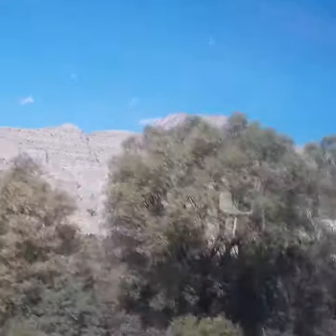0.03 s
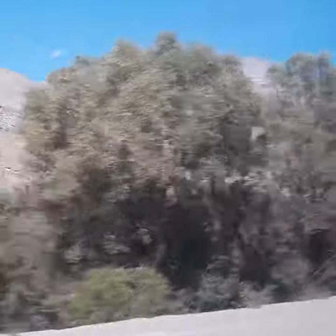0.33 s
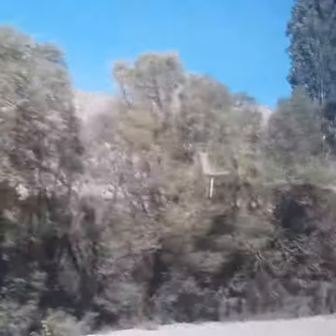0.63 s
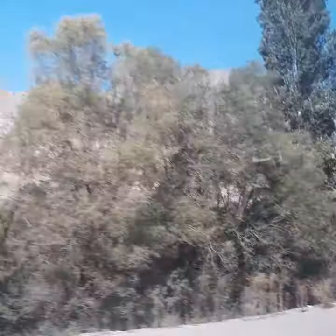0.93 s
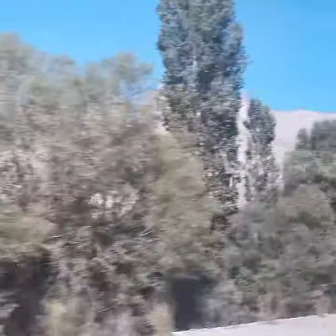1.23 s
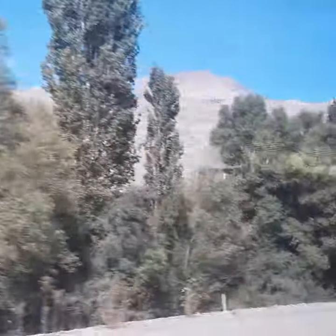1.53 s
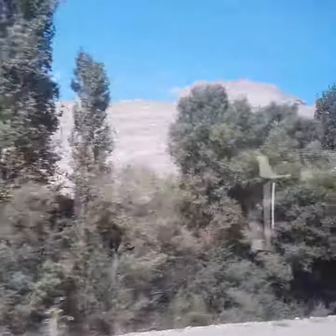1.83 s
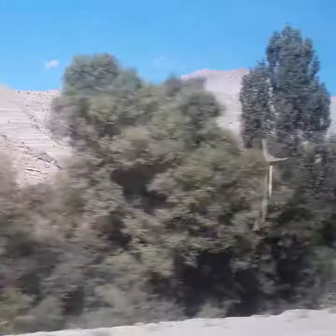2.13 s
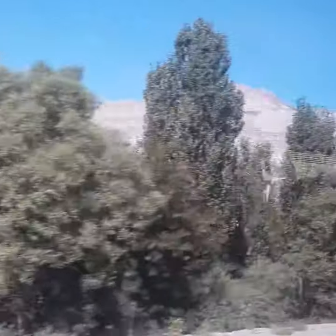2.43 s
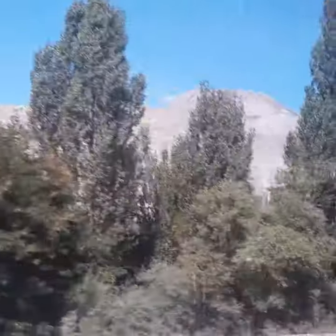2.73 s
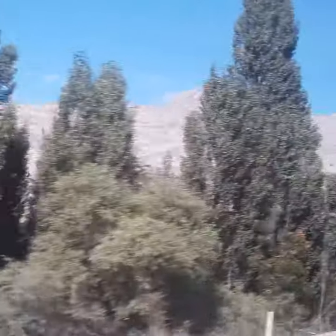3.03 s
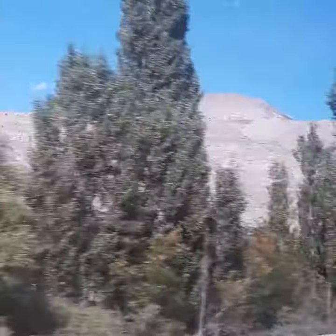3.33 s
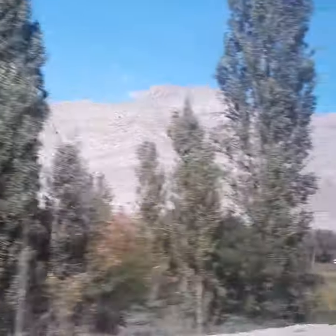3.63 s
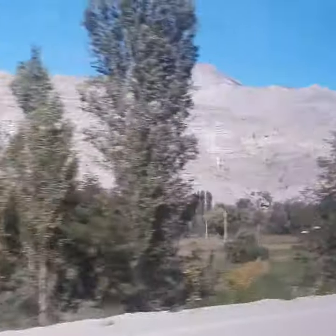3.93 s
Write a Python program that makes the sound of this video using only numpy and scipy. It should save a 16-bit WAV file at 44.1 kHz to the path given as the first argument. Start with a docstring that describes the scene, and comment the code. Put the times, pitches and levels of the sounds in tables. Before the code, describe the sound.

Low road rumble inside a moving bus, with loose trim knocking and rattling.

```python
"""Inside a bus rolling steadily along a country road, stereo microphones at a window seat.
The road shakes the body and the cabin air into a low boom and rumble, with a few thuds from bumps.
Behind that sit tyre roar through the walls, a faint engine drone and the hiss of passing air.
Loose trim knocks and chatters, parts scuff together and thin squeals come and go. Small ticks sound
close to the left microphone, and late on a thin panel buzzes to the right."""
import sys
import numpy as np
from scipy import signal
from scipy.fft import rfft, irfft
from scipy.io import wavfile
from scipy.ndimage import uniform_filter1d

SR = 44100
rng = np.random.default_rng(int(sys.argv[2]) if len(sys.argv) > 2 else 0)


def persist_wave(psi):
    """Save psi, clipped to +-1, as 16-bit WAV."""
    counts = np.round(np.clip(psi, -1, 1) * 32767).astype(np.int16)
    wavfile.write(sys.argv[1], SR, np.atleast_2d(counts).T)


N = 176400
TIME, FREQ = np.arange(N) / SR, np.fft.rfftfreq(N, 1 / SR)
KNOCK_S = .003  # time scale of one contact of the trim

# lean of the cabin sound to the left microphone: f/Hz, left minus right/dB
CABIN_BALANCE = [(140, 2.5), (215, 0.7), (255, 1.5), (320, 1), (530, 3.5), (800, -0.6)]
# lean of the trim and panel to the left microphone: f/Hz, left minus right/dB
TRIM_BALANCE = [(1000, 9.5), (2300, -5), (3700, -8), (6000, 3), (15000, 3)]
# rise and fall of tyre roar and engine drone: t/s, gain/dB
DRIVE_LEVEL = [(0, 3), (.6, -0.5), (1.7, -0.5), (2.4, 1.1), (3.3, 1), (4, 1.5)]
# how hard the loose fittings shake: t/s, gain/dB
SHAKE_LEVEL = [(.17, 3.5), (.55, 0), (.87, 2), (1.2, 1.5), (1.45, 0), (2.3, 1.5), (2.65, 2.5), (3.14, 3.5),
               (3.3, 0.5), (3.48, 3.5), (3.75, 1)]


def amp(db):
    """Decibels to gain."""
    return 10 ** (np.asarray(db) / 20)


def unit(x):
    """Scales to rms 1."""
    return x / np.sqrt(np.mean(x ** 2) + 1e-20)


def read(points, hz, column=1):
    """Reads a spectrum table on a log-frequency axis."""
    table = np.transpose(points)
    return np.interp(np.log(hz + 1), np.log(table[0] + 1), table[column])


def level(points):
    """Gain over time from a dB curve."""
    return amp(np.interp(TIME, *np.transpose(points)))


def add(mix, start, sound):
    """Mixes a sound in at a time in seconds."""
    part = mix[..., max(round(start * SR), 0):][..., :sound.shape[-1]]
    part += sound[..., :part.shape[-1]]


def drift(rate_hz):
    """Random wander of rms 1, rolling off above the given rate."""
    lowpass = np.exp(-(FREQ / rate_hz) ** 2) * (FREQ > 0)
    return unit(irfft(rfft(rng.standard_normal(N)) * lowpass, N))


def swell(start, length):
    """An arch of gain that rises at the start and is gone after the length."""
    return np.sqrt(abs(np.sin(np.pi * np.clip((TIME - start) / length, 0, 1))))


def sides(db):
    """Left and right microphone gains for a left-minus-right level."""
    return amp(np.array([db, -db]) / 2)


def cabin_noise(gain):
    """Stereo noise of rms 1 with a given spectral shape, alike at both microphones in the bass."""
    # likeness of the two microphone signals: f/Hz, correlation
    likeness = [(30, 0.77), (90, 1), (160, 0.87), (270, 0.79), (450, 0.64), (740, 0.23), (1220, 0)]
    same = np.clip(read(likeness, FREQ), -1, 1)
    left, independent = rfft(rng.standard_normal((2, N)))
    right = same * left + np.sqrt(1 - same ** 2) * independent
    return unit(irfft(np.array([left, right]) * gain * sides(read(CABIN_BALANCE, FREQ)), N))


def steadied(x, size):
    """Evens out swells longer than about size samples and keeps the quick throb."""
    power = uniform_filter1d(uniform_filter1d((x ** 2).mean(0), size), size)
    return x / np.sqrt(abs(power) + 1e-9)


def colour(x, spectrum, balance, size=2048):
    """Minimum-phase stereo filter of unit energy, so nothing sounds ahead of an attack."""
    hz = np.fft.rfftfreq(size, 1 / SR)
    log_gain = np.log(amp(read(spectrum, hz)) * sides(read(balance, hz)))
    cepstrum = irfft(log_gain)
    cepstrum[:, 1:size // 2] *= 2
    cepstrum[:, size // 2 + 1:] = 0
    taps = unit(irfft(np.exp(rfft(cepstrum)))) / np.sqrt(size)
    return signal.oaconvolve(x, taps, axes=1)[:, :N]


def impact(contact_s, tail_db, tail_s, size=5000):
    """A short burst of contact noise that builds and dies, and its reflections in the cabin."""
    t = np.arange(size) / SR
    age = 2 * t / contact_s
    contact = age * np.exp(1 - age)
    reflections = amp(tail_db) * np.exp(-t / tail_s) * (1 - np.exp(-age))
    return rng.standard_normal((2, size)) * (contact + reflections)


def boom():
    """The uneven road excites the lowest resonances of the air around the microphones."""
    # resonances of the cabin air: f/Hz, width/Hz, relative level/dB
    air_modes = [(44.3, 6.4, -15.5), (80.2, 12.4, -0.5), (100.4, 8.4, -2.5)]
    # surges of the boom: t/s, level/dB
    surges = [(0, -18.5), (.42, -21), (.57, -14.5), (.68, -23), (.88, -25), (1.0, -17.5), (1.24, -19.5),
              (1.36, -24), (1.58, -23.5), (1.74, -17.5), (2.07, -24.5), (2.25, -19.5), (2.44, -16.5),
              (2.7, -25), (3.05, -17.5), (3.16, -24.5), (3.58, -15), (3.75, -25.5)]
    resonance = sum(amp(db) / (1 + ((FREQ - hz) / width) ** 2) ** 1.78 for hz, width, db in air_modes)
    low_cut = 1 - np.exp(-(FREQ / 35.8) ** 4)
    return steadied(cabin_noise(resonance * low_cut), size=5000) * level(surges)


def road():
    """Rumble comes up through the floor and tyre roar in through the walls."""
    # spectrum of the shaking floor and body: f/Hz, relative level/dB
    rumble_spectrum = [(27, -36), (42, -26), (60, -3), (85, -12.5), (110, 1), (135, 2.5), (165, -1),
                       (186, -2.5), (203, -0.5), (225, -5), (247, -1), (268, -5), (295, -5.5), (335, -12.5),
                       (420, -21), (700, -30), (2000, -65.5)]
    # rise and fall of the rumble as the surface changes: t/s, gain/dB
    surface = [(0, 1.5), (.7, -0.5), (1.45, -1.5), (2.47, 1.3), (3.2, 1), (4, -.5)]
    # spectrum of the tyres from inside: f/Hz, relative level/dB
    roar_spectrum = [(100, -3), (280, -33), (370, 1), (450, -2.5), (535, 1.5), (590, -1), (640, -2),
                     (745, -7), (850, -7), (1100, -13), (1500, -23), (2200, -35.5), (12000, -76)]
    rumble = amp(-19) * steadied(cabin_noise(amp(read(rumble_spectrum, FREQ))), size=6000)
    roar = amp(-32) * steadied(cabin_noise(amp(read(roar_spectrum, FREQ))), size=6000)
    return rumble * level(surface) + roar * level(DRIVE_LEVEL)


def engine(speed_wander=.0124, waver=.3):
    """A few faint engine orders wander together in pitch, each wavering in strength."""
    # engine orders: f/Hz, level/dB
    orders = [(92, -28.5), (393, -42), (535, -48.5), (635, -47)]
    speed = 1 + speed_wander * drift(2.78)
    drone = np.zeros((2, N))
    for hz, db in orders:
        strength = amp(db) * np.sqrt(2) * (1 + waver * drift(5.8))
        cycles = np.cumsum(hz * speed) / SR + rng.random()
        drone += sides(read(CABIN_BALANCE, hz))[:, None] * strength * np.sin(2 * np.pi * cycles)
    return drone * level(DRIVE_LEVEL)


def air(hiss_db=-43, flicker_db=1.27, patch_db=1):
    """Passing air hisses, flickering slightly and rising with the shake of the fittings."""
    # spectrum of the hiss at each microphone: f/Hz, relative level left/dB, right/dB
    hiss_spectrum = [(494, -43, -20), (1235, 7.5, 4.5), (2140, 0, 4), (3430, -3, -2), (4010, -4.5, -.5),
                     (4850, -8, -8.5), (7600, -15.5, -16.5), (9100, -14, -15), (9900, -20, -20),
                     (12800, -15.5, -23), (15600, -17.5, -51)]
    gain = amp([read(hiss_spectrum, FREQ, column=1), read(hiss_spectrum, FREQ, column=2)])
    noise = irfft(rfft(rng.standard_normal((2, N))) * gain, N)
    frames = signal.stft(noise, nperseg=512)[2]
    patches = rng.standard_normal(frames.shape[1:])  # louder and softer spots in frequency and time
    patches = unit(uniform_filter1d(uniform_filter1d(patches, size=9, axis=0), size=9, axis=1))
    hiss = signal.istft(frames * amp(patch_db * patches), nperseg=512)[1][:, :N]
    return amp(hiss_db + flicker_db * drift(26)) * level(SHAKE_LEVEL) ** .79 * unit(hiss)


def chatter(taps_per_s=100, spread_db=8.5, chatter_db=-54):
    """Shaking trim makes faint random taps, each a dying burst of noise."""
    onsets = rng.random(N) < taps_per_s / SR
    taps = onsets * amp(spread_db * np.minimum(rng.exponential(1, N), 3))
    contact = signal.lfilter([1], [1, -np.exp(-1 / (KNOCK_S * SR))], taps)
    return amp(chatter_db) * level(SHAKE_LEVEL) * unit(contact * rng.standard_normal((2, N)))


def trim_ring(spread_db=1.2, detune=.04, size=6000):
    """Struck trim rings hollow, in a slightly different blend and tuning at every blow."""
    # modes of the trim: f/Hz, relative level/dB, t60/s
    modes = [(935, -5, 0.068), (1172, -11, .05), (1750, -10, 0.019), (2180, -1, .022), (2620, -9, .028),
             (3720, -9.5, 0.042)]
    t = np.arange(size) / SR
    ring = np.zeros((2, size))
    for hz, db, t60 in modes:
        fade = amp(db + spread_db * rng.standard_normal()) * np.exp(-np.log(1000) * t / t60)
        pitch = hz * (1 + detune * rng.standard_normal())
        tone = np.sin(2 * np.pi * (pitch * t + rng.random((2, 1))))
        ring += sides(read(TRIM_BALANCE, hz))[:, None] * fade * tone
    return ring * (1 - np.exp(-2 * t / KNOCK_S))


def trim(treble_hz=4150):
    """Loose trim, jolted by the road, knocks with a clack and a ring over its own faint chatter."""
    # knocks of the trim: t/s, level/dB, extra treble/dB
    knocks = [(0.2484, -33.5, 3.5), (.32, -37, 0), (0.3395, -32, 7), (.348, -35, -1), (.92, -33.5, -7),
              (1.078, -39, 6), (1.1453, -33, 0), (1.162, -33, -6), (1.2253, -29.5, 3.5), (1.284, -37.5, 0),
              (2.15, -27, -4), (2.4254, -35, 1), (2.645, -34, 2.5), (2.911, -30, 6), (2.924, -34, 1),
              (3.105, -33.5, -4), (3.241, -35, 0), (3.392, -36, -12), (3.404, -25.5, -2),
              (3.4198, -29, 0.5), (3.5234, -38.5, 6), (3.7184, -33.5, 2.5), (3.839, -34.5, 1)]
    # spectrum of the clack: f/Hz, relative level/dB
    clack_spectrum = [(300, -48), (1100, 4), (1700, -3), (2250, 3.5), (3100, -10.5), (3700, -4.5),
                      (4600, -11), (7000, -12), (10500, -20.5), (13000, -18), (16000, -31)]
    clacks = chatter()
    rings = np.zeros((2, N))
    for start, db, treble_db in knocks:
        hit = impact(KNOCK_S, tail_db=-13, tail_s=.018)
        shelf = 1 - np.exp(-(np.fft.rfftfreq(hit.shape[1], 1 / SR) / treble_hz) ** 4)
        add(clacks, start, irfft(rfft(hit) * amp(db + treble_db * shelf)))
        add(rings, start, amp(db - .4 * treble_db) * trim_ring())  # dull knocks ring more
    return colour(clacks, clack_spectrum, TRIM_BALANCE) + rings


def scuffs(rise_s=.0033, fade_db=-13, grain_db=3.6):
    """Parts rub together in short grainy strokes that start quickly and fade."""
    # rubs: t/s, time to fall by fade_db/s, level/dB
    rubs = [(0.067, 0.044, -37), (0.146, 0.14, -46.5), (0.186, 0.015, -40), (0.395, 0.081, -45.5),
            (1.136, .04, -42.5), (2.9037, 0.028, -26), (3.093, 0.063, -43.5), (3.362, 0.078, -41),
            (3.47, 0.11, -50.5)]
    # spectrum of the rubbing: f/Hz, relative level/dB
    rub_spectrum = [(500, -48), (1500, -5), (2700, 4.5), (4500, -1), (7000, 5.5), (10700, -4),
                    (13000, -1.5), (16000, -12)]
    # lean of the rubbing to the left microphone: f/Hz, left minus right/dB
    rub_balance = [(2000, -7), (7000, 0.5), (15000, 8)]
    t = np.arange(SR // 2) / SR
    envelope = np.zeros(N)
    for start, length, db in rubs:
        add(envelope, start, np.minimum(t / rise_s, 1) * amp(db + fade_db * t / length))
    grain = unit(amp(grain_db * drift(240)))
    return colour(envelope * grain * rng.standard_normal((2, N)), rub_spectrum, rub_balance)


def squeals(sag_hz_per_s=1100):
    """Faint unsteady whistles left of centre swell, sag in pitch and die away."""
    # thin whistles: t/s, length/s, starting f/Hz, width of the pitch jitter/Hz, level/dB
    whistles = [(.69, .24, 14200, 1500, -57), (0.868, .105, 5170, 60, -54), (1.0, .048, 5110, 60, -61)]
    out = np.zeros(N)
    for start, length, hz, width, db in whistles:
        pitch = hz - sag_hz_per_s * (TIME - start) + width / 2 * drift(width)
        out += amp(db) * swell(start, length) * np.sin(2 * np.pi * np.cumsum(pitch) / SR)
    return out * sides(db=4)[:, None]


def ticks(left_db=12):
    """Tiny bright contacts click close to the left microphone."""
    # close clicks: t/s, level/dB
    clicks = [(.8493, -24.5), (1.932, -38), (2.023, -34), (2.406, -33), (2.7855, -28), (3.41, -36)]
    # spectrum of a click: f/Hz, relative level/dB
    click_spectrum = [(1000, -24), (3800, 0), (5000, -16), (7000, -18), (8500, -2.5), (10500, -10),
                      (12500, 0.5), (16000, -0.5)]
    out = np.zeros((2, N))
    for start, db in clicks:
        add(out, start, amp(db) * impact(contact_s=.0011, tail_db=-12.5, tail_s=.0099))
    return colour(out, click_spectrum, balance=[(1, left_db)])


def bumps(rise_s=.023):
    """The wheels jolt over bumps, each a short low thud in the cabin."""
    # jolts of the wheels: t/s, level at the crest/dB
    jolts = [(2.409, -19.5), (3.043, -15.5), (3.528, -19.5)]
    # spectrum of the thud: f/Hz, relative level/dB
    thud_spectrum = [(30, -36), (80, -3), (550, -21.5), (4000, -80)]
    envelope = np.zeros(N)
    for start, db in jolts:
        age = np.maximum(TIME - start, 0) / rise_s
        envelope += amp(db) * age * np.exp(1 - age)
    return envelope * steadied(cabin_noise(amp(read(thud_spectrum, FREQ))), size=1500)


def panel(resonance_hz=2210, width_hz=90):
    """A thin panel to the right of the microphones buzzes at its resonance in short spells."""
    # spells of buzzing: t/s, length/s, level/dB
    spells = [(2.966, 0.22, -47), (3.447, 0.31, -54)]
    buzz = cabin_noise(1 / (1 + (2 * (FREQ - resonance_hz) / width_hz) ** 2))
    strength = sum(amp(db) * swell(start, length) for start, length, db in spells)
    return strength * buzz * sides(read(TRIM_BALANCE, resonance_hz))[:, None]


def scene():
    """Everything that reaches the microphones at the window seat."""
    ride = boom() + road() + bumps() + engine() + air()
    fittings = trim() + panel() + ticks() + scuffs() + squeals()
    return ride + fittings


def record(dry):
    """Soft ends and the recorder's band limit."""
    fade_s, edge_hz = .008, 15800
    to_nearest_end = np.minimum(TIME, TIME[::-1])
    ends = np.sin(np.pi / 2 * np.minimum(to_nearest_end / fade_s, 1)) ** 2
    lowpass = signal.firwin(511, edge_hz, window=("kaiser", 9), fs=SR)
    return signal.oaconvolve(dry * ends, lowpass[None], "same")


dry = scene()
out = record(dry)
persist_wave(out)
```